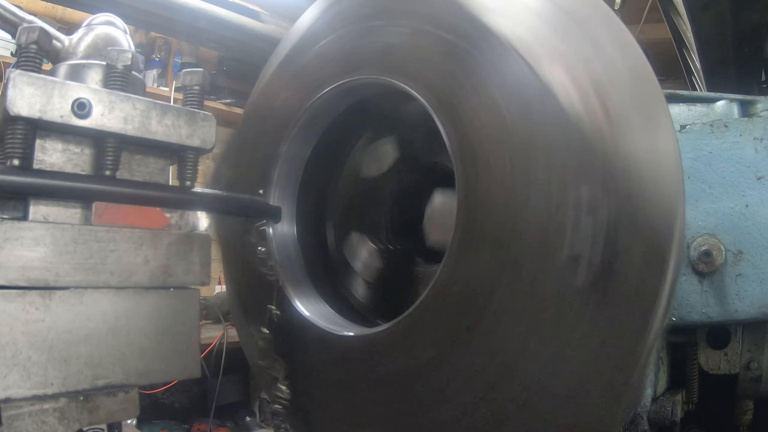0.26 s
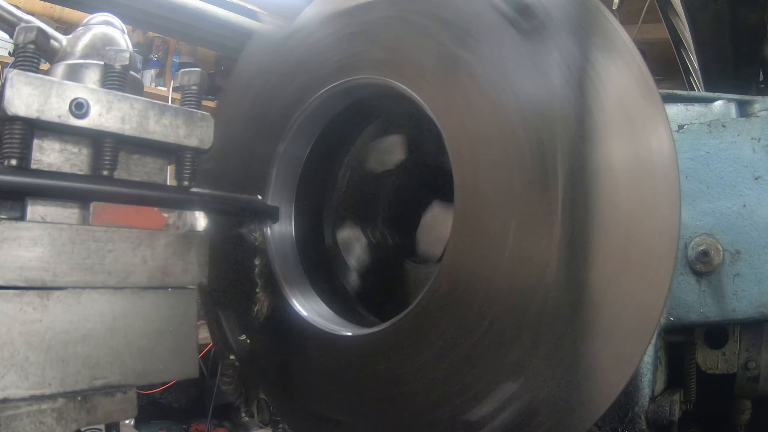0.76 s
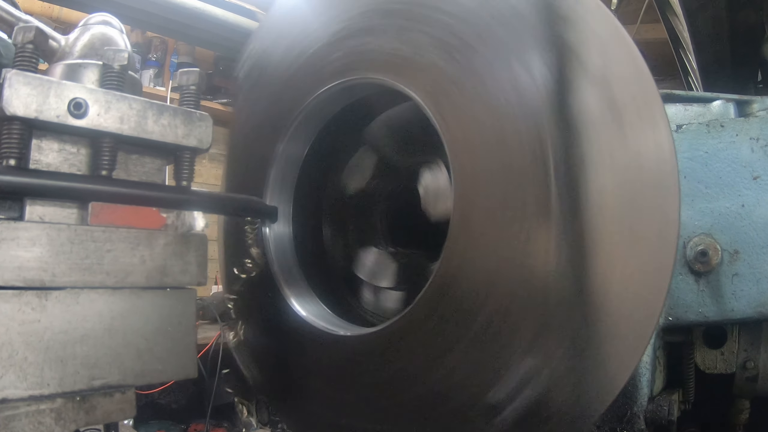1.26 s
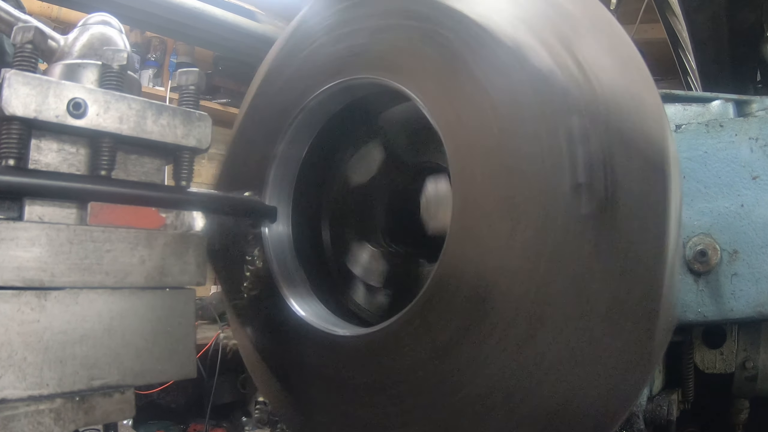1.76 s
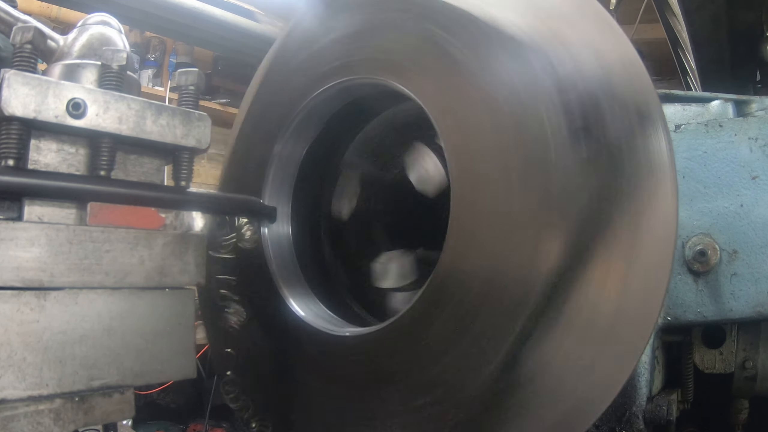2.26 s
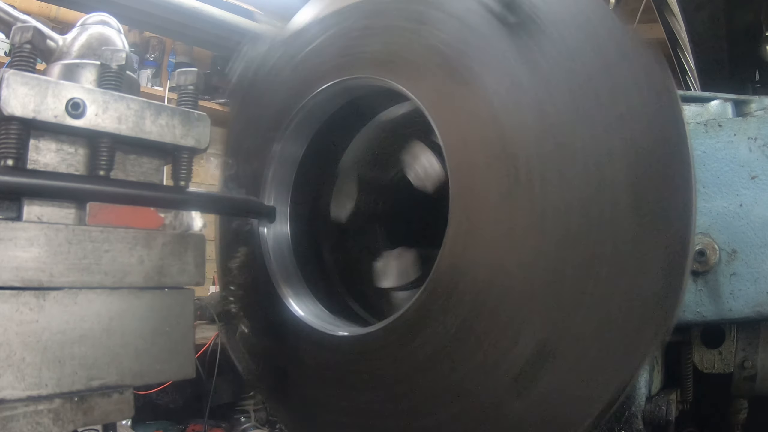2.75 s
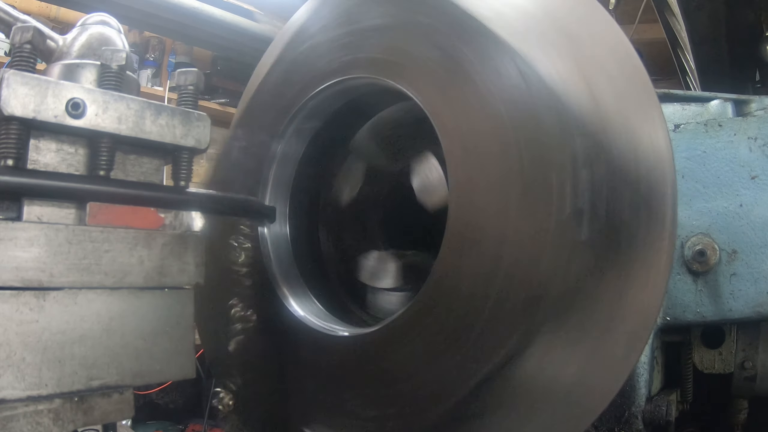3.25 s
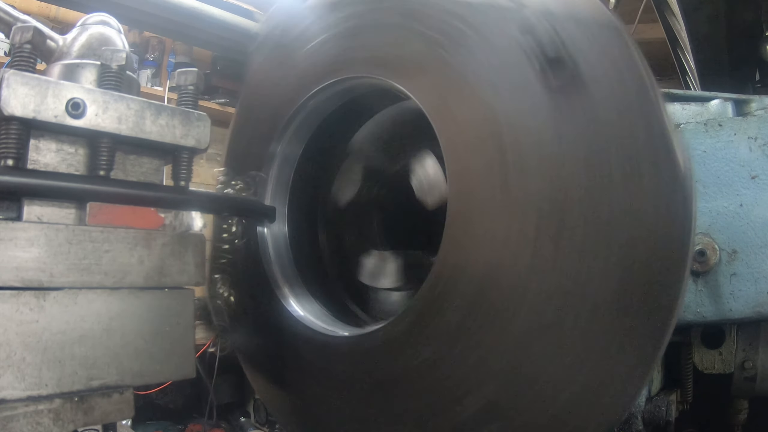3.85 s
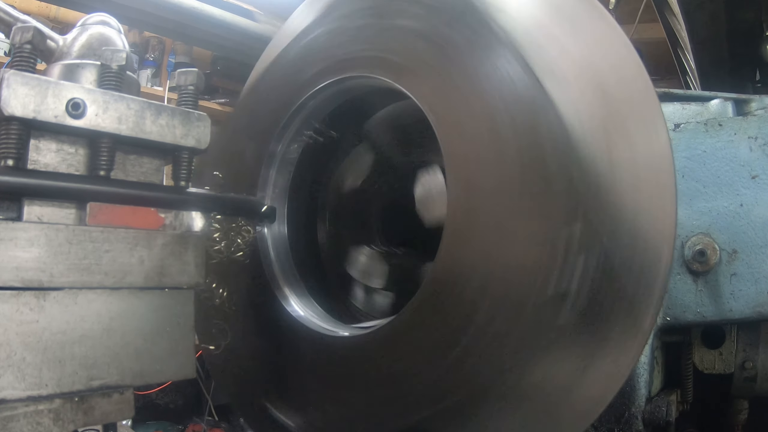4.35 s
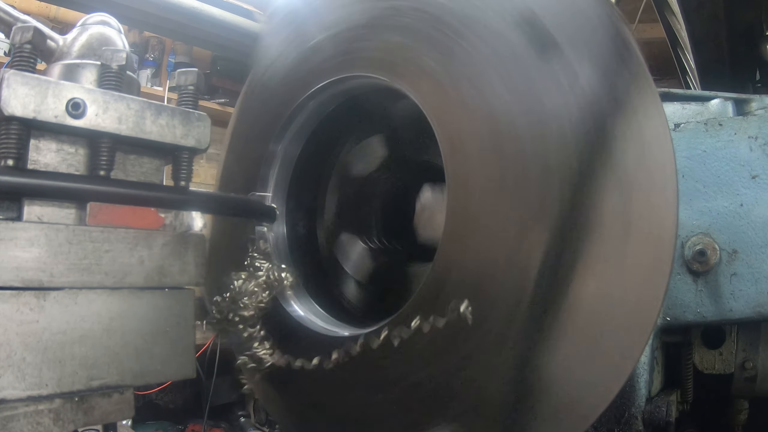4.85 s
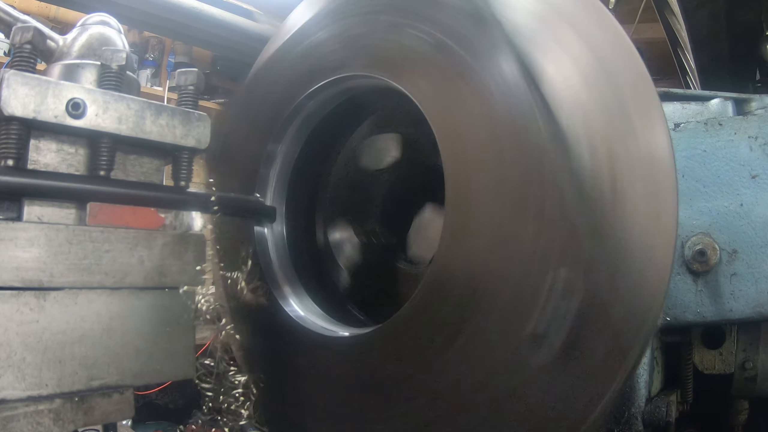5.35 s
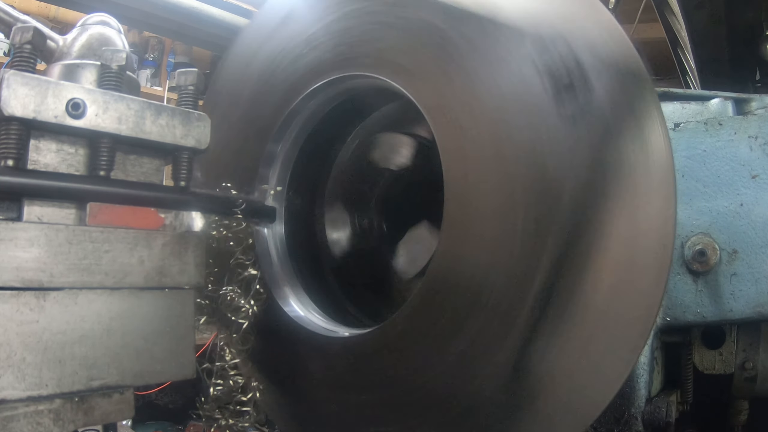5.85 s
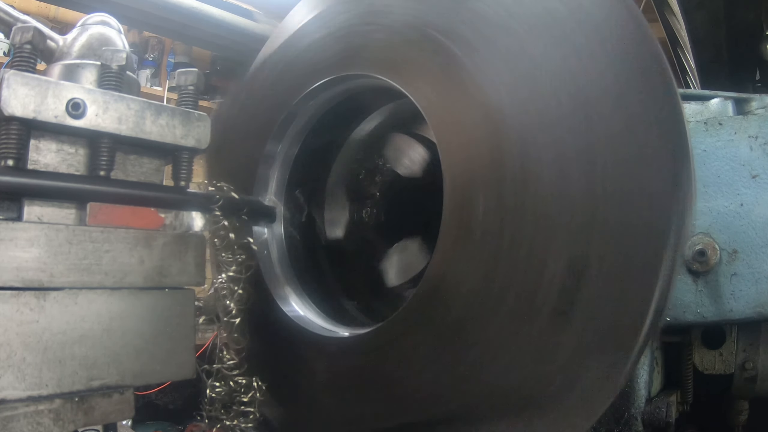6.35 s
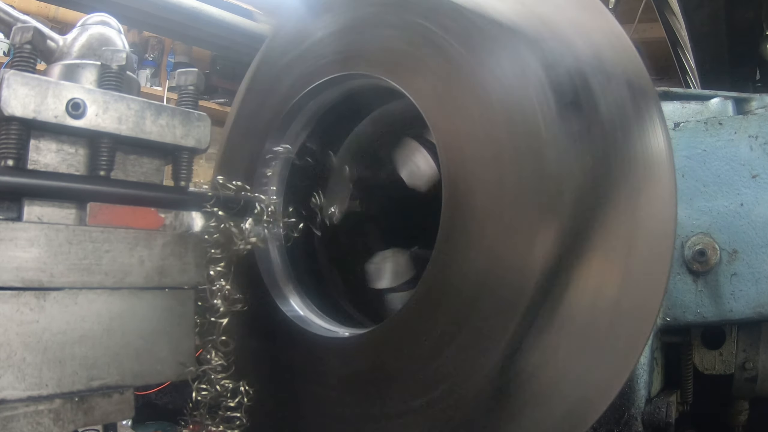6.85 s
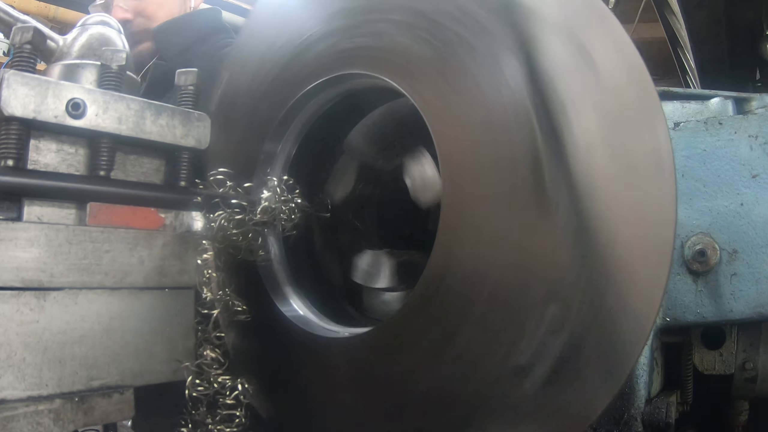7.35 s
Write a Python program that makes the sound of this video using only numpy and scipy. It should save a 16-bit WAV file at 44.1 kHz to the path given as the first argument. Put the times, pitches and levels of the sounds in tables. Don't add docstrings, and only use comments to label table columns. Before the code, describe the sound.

A lathe cutting a big steel disc shrieks with a loud, high, fluttering metallic squeal over motor hum, gear roar and faint swarf hiss.

```python
import sys
import numpy as np
from scipy import signal
from scipy.fft import rfft, irfft
from scipy.io import wavfile
from scipy.ndimage import uniform_filter1d, minimum_filter1d

SR = 44100
rng = np.random.default_rng(int(sys.argv[2]) if len(sys.argv) > 2 else 0)


def to_wav(sig):
    pcm = np.clip(np.atleast_2d(sig), -1, 1) * 32767
    pcm = np.round(pcm).astype(np.int16)
    wavfile.write(sys.argv[1], SR, pcm.T)


def magnitude_from_level(level_db):
    exponent = np.asarray(level_db, float) / 20
    return 10 ** exponent


N = 336042
TIME = np.arange(N) / SR
CUT_S, TURN_S = 2.468, .2937
SECOND = np.clip((TIME - CUT_S) / .0012, 0, 1)


def squeal():
    # (pitch error rms [Hz], slowest change [1/s], fastest change [1/s])
    bite = [(5.8, 7, 32), (9.3, 8, 50)]
    # (shot one [dB], shot two [dB], follow [dB per dB of ease], slope in shot two [dB/s])
    multiples = [(-10.5, -15.5, -0.98, 0.03), (-41, -43.5, 1.33, 0.2), (-28., -30, .5, -.4),
                 (-37.5, -37.5, 1.15, -0.64)]
    # (shot one [dB], shot two [dB])
    room_db = [(-9.5, -8), (-5.5, 3.5), (-9.5, -3.5), (2.5, 3), (-2.5, 0.5)]
    # (time [s], width [s], level [dB])
    dips = [
        (.045, .012, -5.),
        (.14, .012, -5.),
        (.19, .006, -10.),
        (2.095, .018, -7.),
        (2.4, .014, -8.),
    ]
    chatter_hz, grain, grain_per_s = 2755.6, .14, 90.
    fifth_db, fifth_side_db, fourth_side_db = -13.2, -2.5, -25

    error_hz = by_shot(*(wobble(*row) for row in bite))
    phase = 2 * np.pi * np.cumsum(chatter_hz + error_hz) / SR
    levels_db = [eased(TIME, *row) for row in multiples]
    levels_db[0] = levels_db[0] + sum(db * bump(TIME - s, width_s) for s, width_s, db in dips)
    levels_db.append(levels_db[3] + fifth_db)

    mid, parts = 0, []
    for k, level_db in enumerate(levels_db):
        swing = disc() if k == 0 else evened(1 + grain * drift(grain_per_s))
        direct = np.sqrt(2) * (np.exp(1j * (k + 1) * phase) * swing).real
        parts.append(direct)
        heard = direct + magnitude_from_level(by_shot(*room_db[k])) * echo(direct)
        mid = mid + magnitude_from_level(level_db + 1.16) * steadied(heard)
    side = magnitude_from_level(fourth_side_db + levels_db[3]) * echo(parts[3])
    side = side + magnitude_from_level(fifth_side_db + levels_db[4]) * echo(parts[4])
    return mid, side


def disc():
    # (place in turn [0-1], width [turns], depth [dB], pitch shift [Hz])
    shadows = [
        (.14, .055, -4.6, -3.),
        (.63, .03, -5.4, -2.5),
        (.855, .02, -4.4, 11.),
    ]
    node_turn = .047
    back, forth, tool, scatter = magnitude_from_level(np.array((0, -1.2, -7.5, -6)))

    turn = TIME / TURN_S
    place, width, depth_db, shift_hz = np.transpose(shadows)
    shade = bump((turn[:, None] - place + .5) % 1 - .5, width)
    face = magnitude_from_level(shade @ depth_db) * np.exp(2j * np.pi * np.cumsum(shade @ shift_hz) / SR)

    lobes = np.exp(1j * (8 * np.pi * (turn - node_turn) + np.pi / 2))
    ring = back * (1 + scatter * drift(12.5)) / lobes
    ring = ring + forth * (1 + scatter * drift(9.0)) * lobes
    ring = ring + tool * drift(37.0)
    ring = ring / (abs(ring) + .2) ** .4
    return by_shot(evened(face), evened(ring))


def wobble(rms_hz, slow_hz, fast_hz):
    fast = drift(fast_hz).real
    return rms_hz * evened(fast - 0.612 * uniform_filter1d(fast, round(SR / slow_hz / 2)))


def echo(x):
    shop_t60_s = 0.58
    t = np.arange(SR) / SR
    tail = rng.standard_normal(SR) * magnitude_from_level(-60 * t / shop_t60_s)
    led_in = np.r_[x[SR - 1::-1], x]
    return evened(signal.fftconvolve(led_in, tail)[SR:SR + N])


def steadied(x):
    return x / np.sqrt(uniform_filter1d(x ** 2, round(TURN_S * SR)) + 1e-9)


def drive():
    # (frequency [Hz], level [dB per Hz])
    roar_spectra = [
        [(15, -43.5), (25, -28), (48, -10.5), (103, -3.5), (145, -8.5), (294, -12.5), (342, -15), (399, -17.5), (734, -25), (824, -23), (978, -30), (1230, -28), (1730, -58), (2400, -34), (3120, -78), (5280, -120)],
        [(15, -40), (25, -8.5), (120, 0.5), (193, -9), (243, -6), (317, -11), (391, -9.5), (447, -15), (694, -20), (856, -19.5), (1060, -28), (1230, -19), (1430, -41), (2400, -41), (3120, -73), (5280, -120)],
    ]
    # (frequency [Hz], level [dB per Hz])
    hiss_spectrum = [(2400, 4), (3300, 1), (4000, -3.5), (4900, -2.5), (6000, -5.5), (7000, -17.5),
                     (7900, -2.5), (8700, -4.5), (9600, -22.5), (10600, -13), (11300, -8), (13300, -21.5),
                     (14000, -16), (14900, -29.5)]
    # (frequency [Hz], side over mid [dB])
    hiss_side = [(10300, -48.5), (11000, -4), (12000, -6.5), (13000, -3), (13600, 18), (15000, -5.5)]

    hz = np.fft.rfftfreq(1024, 1 / SR)[:, None]
    t = (np.arange(N // 256 + 8) * 256 - 512) / SR
    roar_db = eased(t, -20, -21, 0.82)
    hiss_db = eased(t, -47, -48., 1.18)
    patches = rng.standard_normal((len(t), 513)).T
    patches = uniform_filter1d(patches, size=10, axis=0)
    patches = evened(uniform_filter1d(patches, size=10, axis=1))
    flicker = evened(uniform_filter1d(rng.standard_normal(len(t)), size=3))

    one, two = (per_bin(points, hz, (150, 700)) for points in roar_spectra)
    roar = noise(np.where(t >= CUT_S, two - 2.4, one - 2.4) + roar_db + 1.1 * patches)
    hiss = per_bin(hiss_spectrum, hz, (3200, 5000)) - 80 * (hz > 15100)
    hiss = hiss + hiss_db + 3.0 + 1.1 * patches + 1.2 * flicker
    return roar + noise(hiss), noise(hiss + read(hiss_side, hz))


def noise(db):
    a, b = rng.standard_normal((2,) + db.shape[::-1])
    z = (a + 1j * b).T * magnitude_from_level(db)
    return signal.istft(z, nperseg=1024, noverlap=768)[1][512:512 + N] * .85


def per_bin(points, hz, band_hz):
    db = read(points, hz)
    inside = (hz > band_hz[0]) & (hz < band_hz[1])
    return db - 10 * np.log10(np.sum(magnitude_from_level(db[inside]) ** 2))


def whine():
    # (time [s], width [s], level [dB])
    swells = [
        (.25, 0.22, 3.5),
        (3.53, .08, 3.),
        (7.25, 0.079, 6.5),
    ]
    note_hz, width_hz, level_db, follow = 1248., 33, -46, 2.3
    beat_s, beat_at_s, beat_db = .214, 2.9, 4.

    note = (1.0 + drift(width_hz / 2)) * np.exp(2j * np.pi * note_hz * TIME)
    whine_db = eased(TIME, level_db, level_db + .6, follow)
    whine_db = whine_db + sum(db * bump(TIME - s, swell_s) for s, swell_s, db in swells)
    beat = SECOND * beat_db * np.cos(2 * np.pi * (TIME - beat_at_s) / beat_s)
    return magnitude_from_level(whine_db + beat) * evened(note.real)


def motor():
    # (frequency [Hz], level [dB], unsteadiness [0-1])
    lines_one = [(100., -17.3, .06), (145.5, -24.6, .3), (200., -29, .3), (250., -33, .55), (280., -32, .6),
                 (300., -30.5, .25), (400., -34.5, .4), (500., -43, .5), (600., -46, .5), (797., -45, .5),
                 (823., -37.3, .08), (2611., -44, .55)]
    # (frequency [Hz], level [dB], unsteadiness [0-1])
    lines_two = [(80., -30, .9), (130., -28.5, .45), (146., -29.5, .4), (196., -28.3, .28), (248., -37, .7),
                 (343., -40, .7), (392., -34, .28), (775., -48, .35), (862., -46.5, .6), (2180., -59, .3)]
    return magnitude_from_level(eased(TIME, 0, 0, 0.41)) * by_shot(lines(lines_one), lines(lines_two))


def lines(rows):
    out = np.zeros(N)
    for hz, db, loose in rows:
        waver = 1 - loose + loose * drift(7.7)
        tone = waver * np.exp(2j * np.pi * (hz * TIME + rng.random()))
        out += magnitude_from_level(db) * evened(tone.real)
    return out


def knocks():
    # (time [s], frequency [Hz], level [dB], t60 [s])
    thuds = [
        (0.551, 84.3, -21, 0.78),
        (3.42, 259.3, -22.5, 0.23),
        (3.47, 91, -29, 0.13),
        (4.268, 296, -29, 0.13),
        (5.53, 560, -18.5, 0.051),
    ]
    out = np.zeros(N)
    for s, hz, db, t60_s in thuds:
        t = np.maximum(TIME - s, 0)
        fade = magnitude_from_level(db - 60 * t / t60_s) * (1 - np.exp(-t / 0.01))
        out += fade * np.sin(2 * np.pi * hz * t) * 3
    return out


def scrapes():
    # (middle [s], width [s], lowest [Hz], highest [Hz], level [dB])
    puffs = [
        (.185, .025, 3200, 3900, -44),
        (5.472, .012, 3150, 3700, -41),
        (7.21, .008, 1300, 4400, -44),
        (7.3, .01, 800, 2000, -37),
        (7.36, .008, 3000, 4400, -45),
    ]
    out = np.zeros(N)
    for s, width_s, low_hz, high_hz, db in puffs:
        band = signal.butter(2, [low_hz, high_hz], "bandpass", fs=SR, output="sos")
        puff = evened(signal.sosfilt(band, rng.standard_normal(N)))
        out += magnitude_from_level(db) * bump(TIME - s, width_s) * puff
    return out


def eased(t, one_db, two_db, follow, db_per_s=0):
    # (time [s], ease [dB])
    ease = [(0.0, 2), (.14, 2.2), (.5, 1.35), (1.65, 1), (2.0, 1), (2.46, 3.5), (2.5, 1), (2.86, -2),
            (3.0, 2.5), (3.5, 2), (3.68, -.7), (4.02, -0.3), (4.24, 1.5), (4.5, -0.1), (5.6, 0.1),
            (6.25, -0.6), (7.03, -.5), (7.42, 2)]
    own_db = np.where(t >= CUT_S, two_db + db_per_s * (t - CUT_S), one_db)
    return own_db + follow * np.interp(t, *np.transpose(ease))


def by_shot(one, two):
    return one * (1 - SECOND) + two * SECOND


def drift(hz):
    f = np.fft.fftfreq(4096, N / SR / 4096)
    white = rng.standard_normal(4096) + 1j * rng.standard_normal(4096)
    z = np.fft.ifft(white / (1 + (f / hz) ** 2))
    return np.interp(TIME, np.arange(4096) * N / SR / 4096, evened(z))


def evened(x):
    return x / np.sqrt(np.mean(abs(x) ** 2) + 1e-20)


def bump(x, width):
    return np.exp(-.5 * (x / width) ** 2)


def read(points, hz):
    f, value = np.transpose(points)
    return np.interp(np.log(hz + 1), np.log(f + 1), value)


def scene():
    tone, tone_side = squeal()
    wash, wash_side = drive()
    mid = tone + wash + whine() + motor() + knocks() + scrapes()
    side = tone_side + wash_side
    return np.array([mid + side, mid - side])


def starved(x):
    # (low [Hz], high [Hz], flare needed [dB], easing [dB/s])
    gates = [(8960, 10340, 3.9, .38), (14300, 15500, 1.5, .05), (11540, 12230, -2.2, .5),
             (15510, 15850, -7., -.5)]
    hz, t, z = signal.stft(x, SR, nperseg=2048)
    power = abs(z[:, :1024].mean(0)) ** 2
    strips_db = 10 * np.log10(power.reshape(64, 16, -1).mean(1) + 1e-20)
    flare_db = strips_db - uniform_filter1d(strips_db, size=20, axis=1)
    flare_db = np.repeat(flare_db, 16, axis=0)[np.minimum(np.arange(1025), 1023)]
    for low_hz, high_hz, need_db, slope in gates:
        band = (hz >= low_hz) & (hz < high_hz)
        z[:, band] *= flare_db[band] + flare_db[band].mean(0) > need_db - slope * t
    return signal.istft(z, SR, nperseg=2048)[1][:, :N]


def band_limit(x):
    return signal.sosfilt(signal.butter(12, 15830, fs=SR, output="sos"), x)


def record(dry):
    room_left = minimum_filter1d(1 / np.maximum(abs(dry).max(0), 1), size=221)
    z = rfft(dry * uniform_filter1d(room_left, size=221))
    hz = np.fft.rfftfreq(N, 1 / SR)
    fold = round(24000 * N / SR)
    k = np.arange(fold // 2, len(hz))
    # (frequency [Hz], level [dB])
    leak = [(12000, -21.5), (13000, -9.5), (14200, -35.0), (15400, -61.5), (15730, -39.5), (17000, -95)]
    z[:, k] += z[:, fold - k].conj() * magnitude_from_level(read(leak, hz[k]))
    return band_limit(starved(irfft(z, N)))


dry = scene()
out = record(dry)
to_wav(out)
```